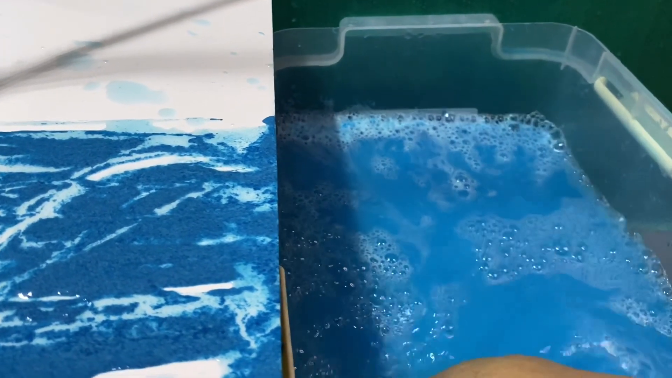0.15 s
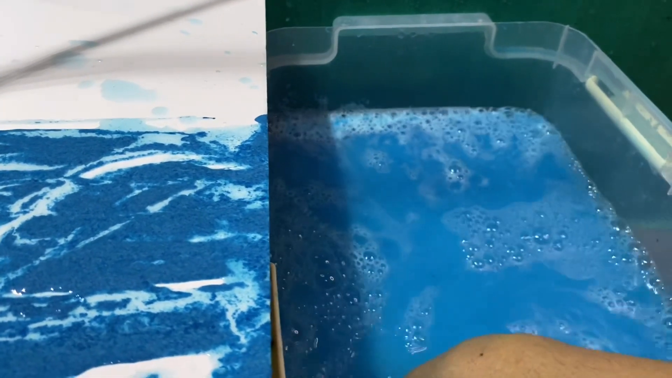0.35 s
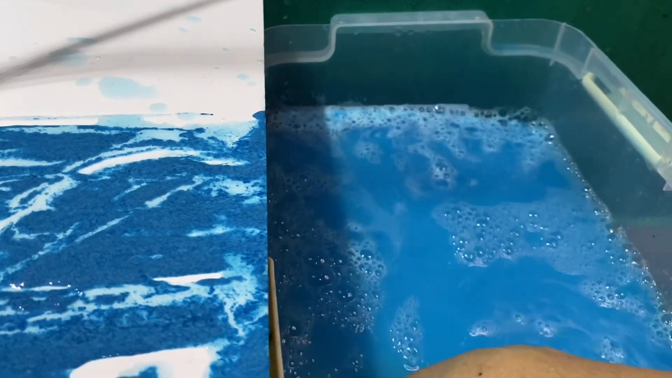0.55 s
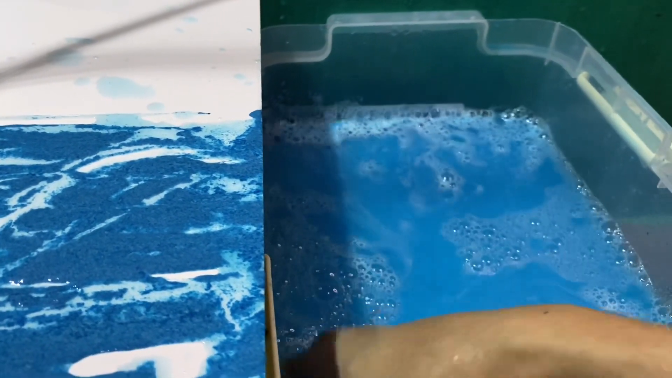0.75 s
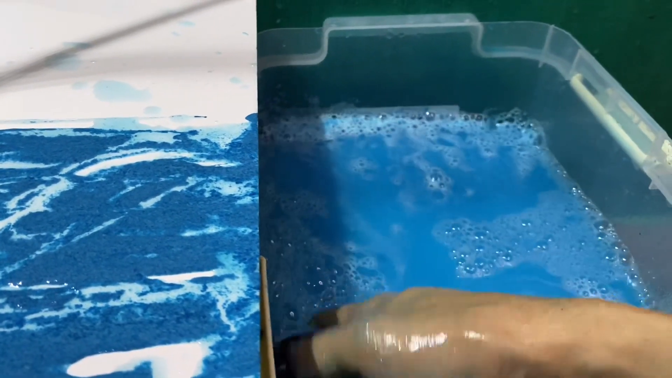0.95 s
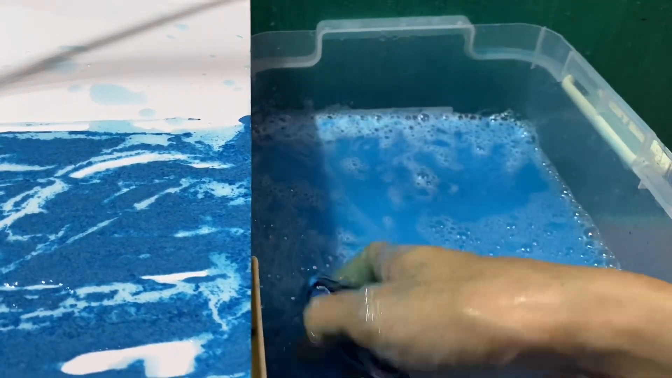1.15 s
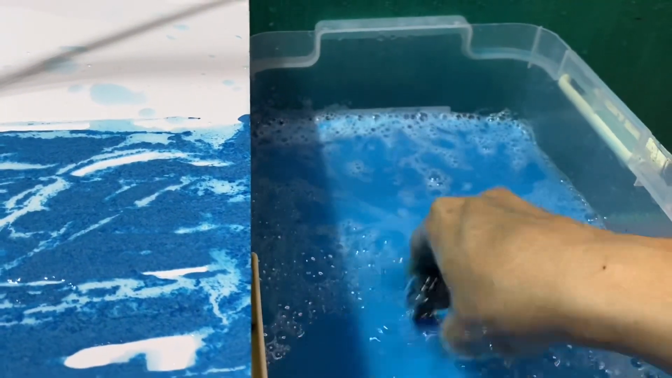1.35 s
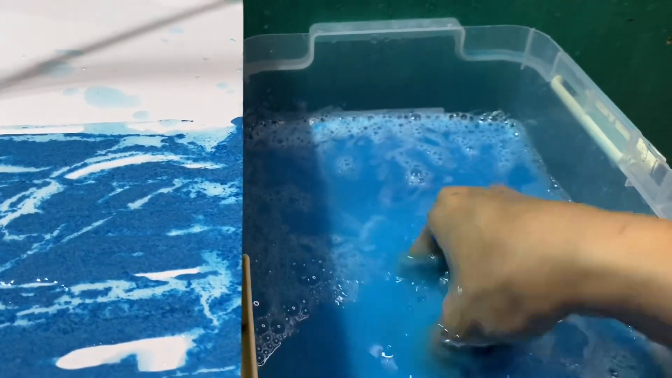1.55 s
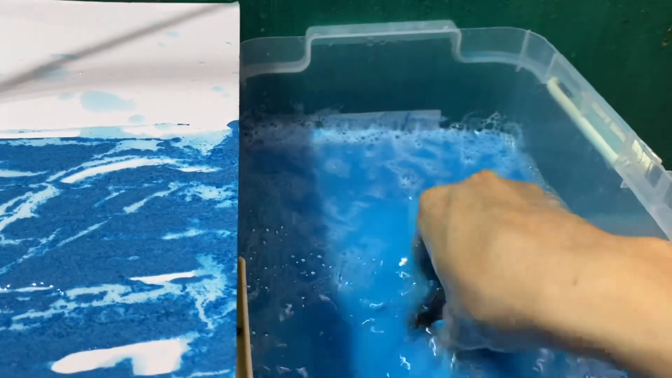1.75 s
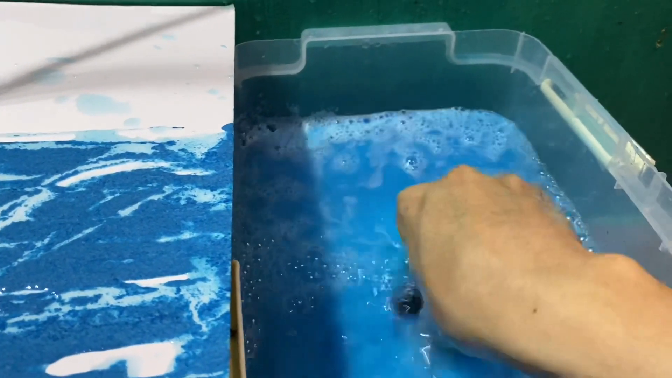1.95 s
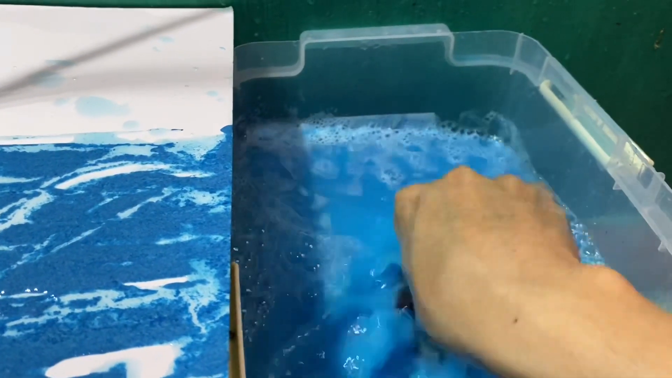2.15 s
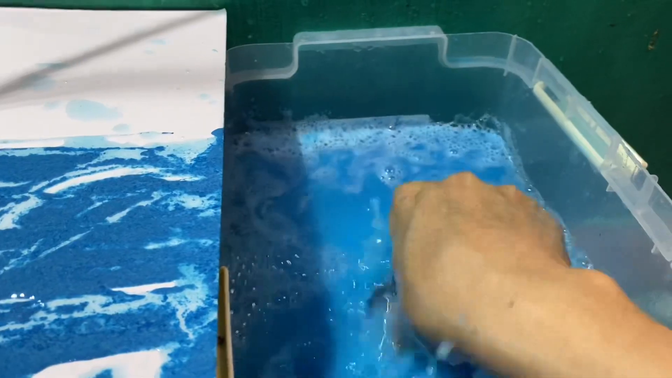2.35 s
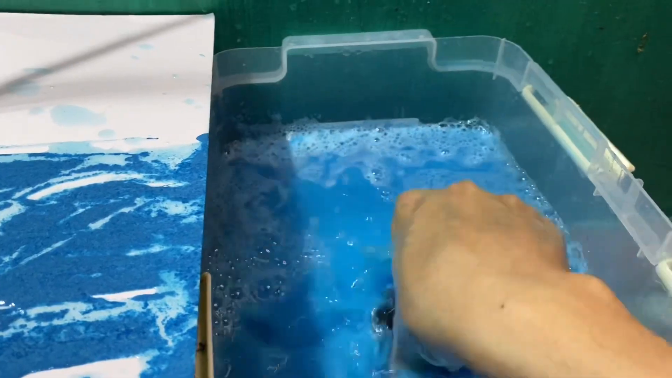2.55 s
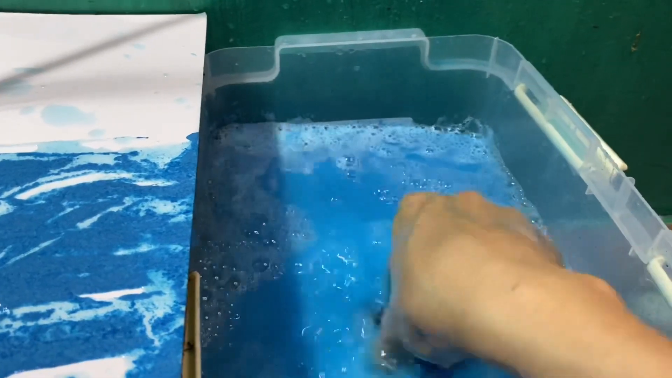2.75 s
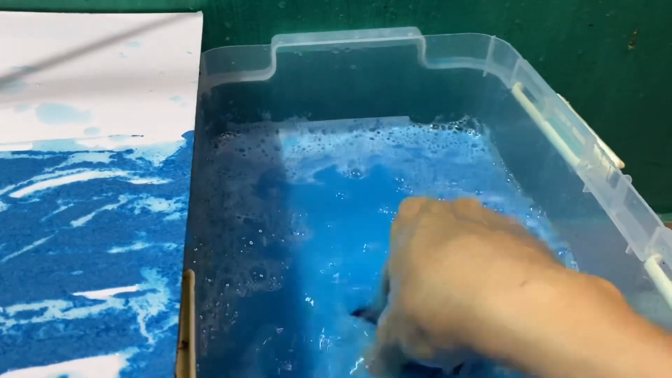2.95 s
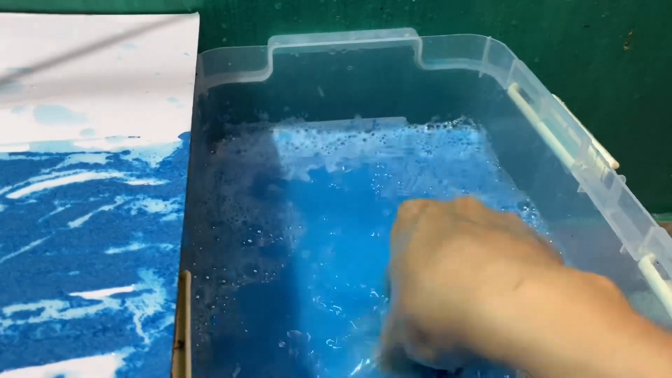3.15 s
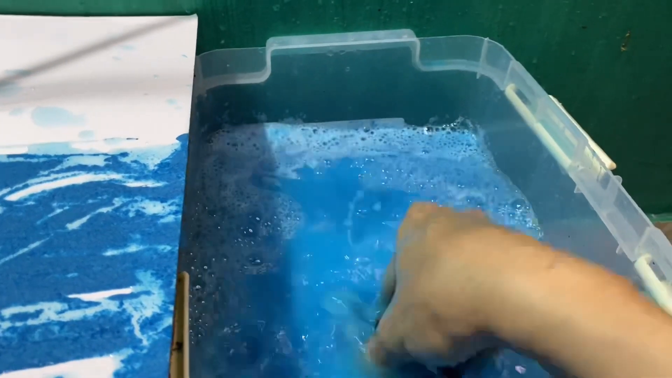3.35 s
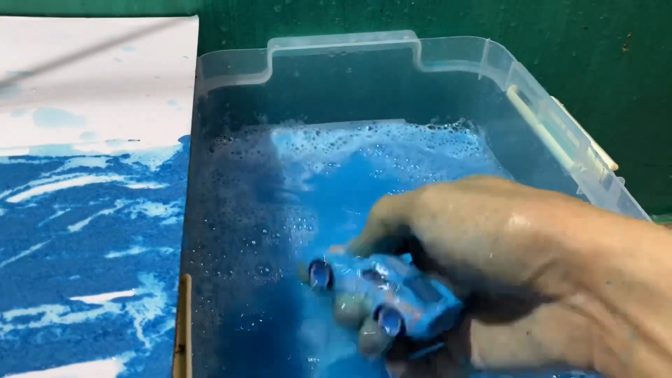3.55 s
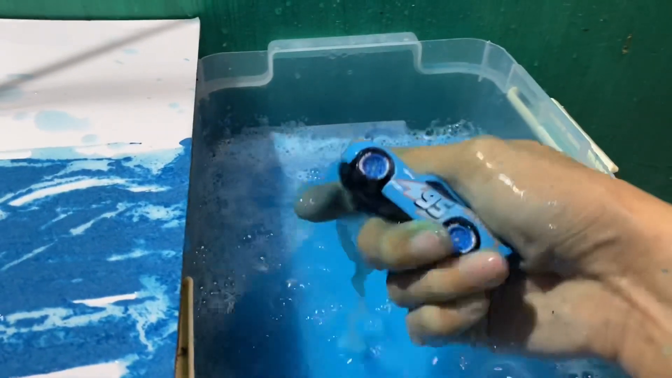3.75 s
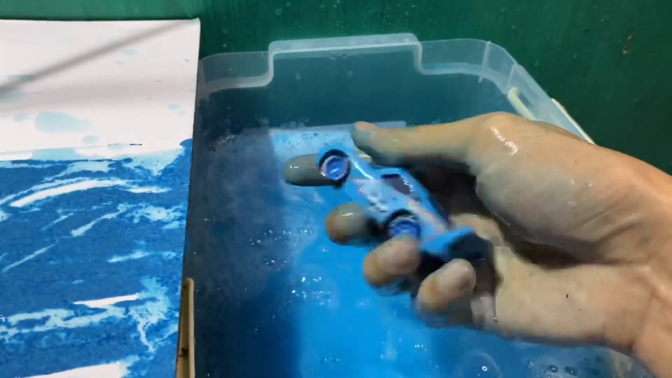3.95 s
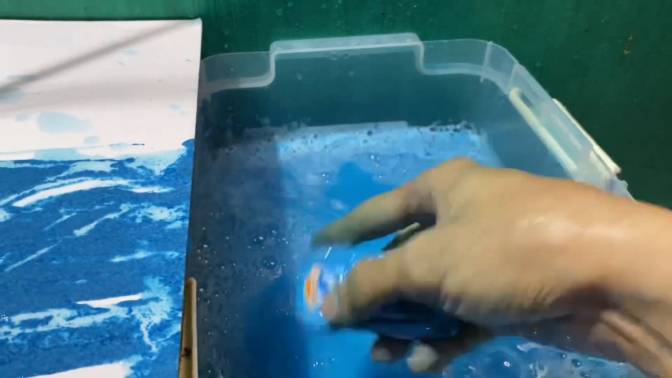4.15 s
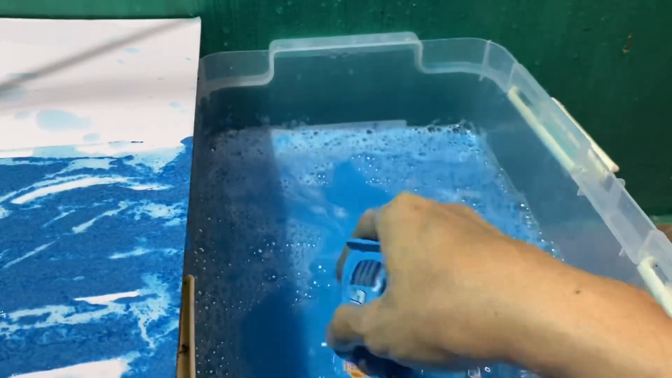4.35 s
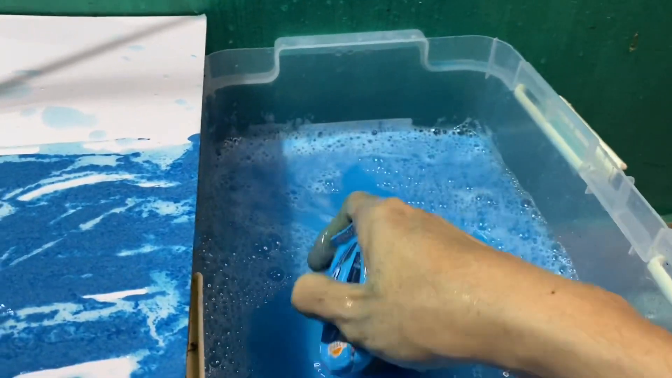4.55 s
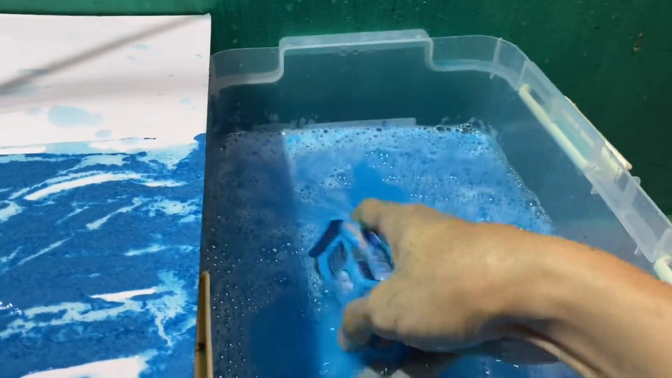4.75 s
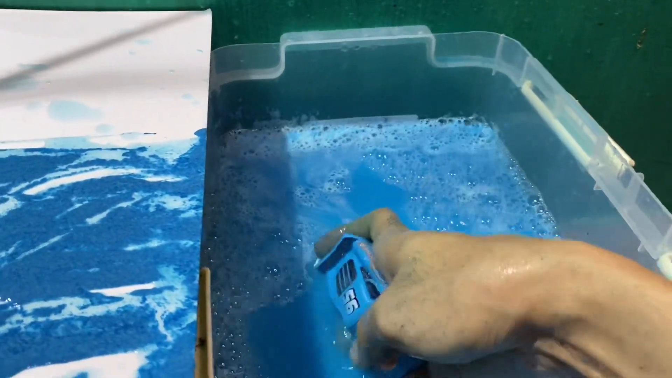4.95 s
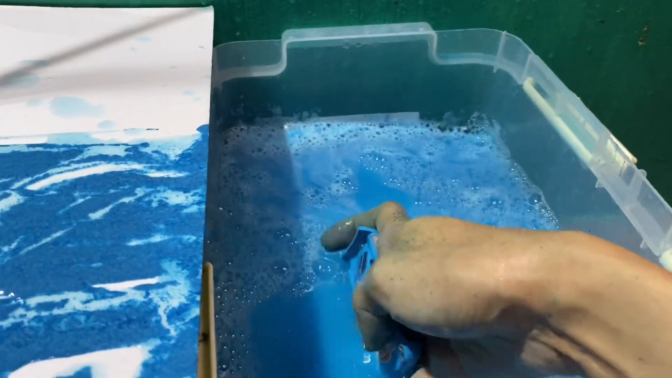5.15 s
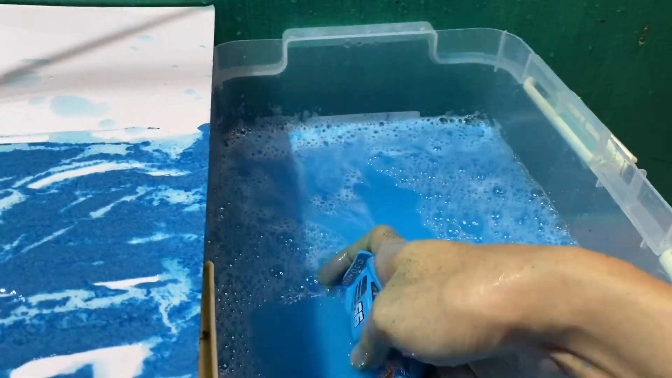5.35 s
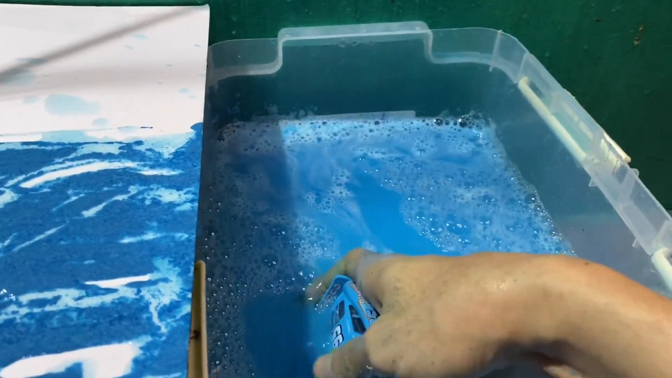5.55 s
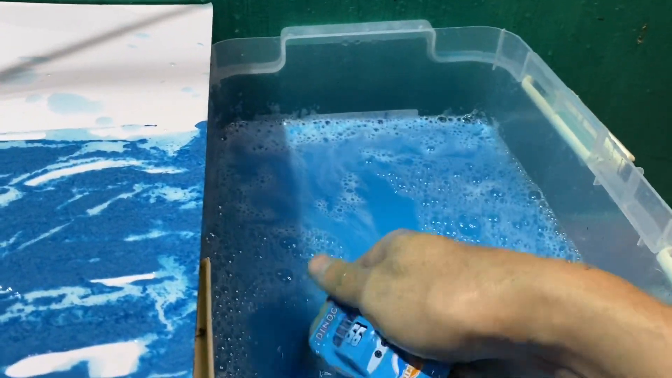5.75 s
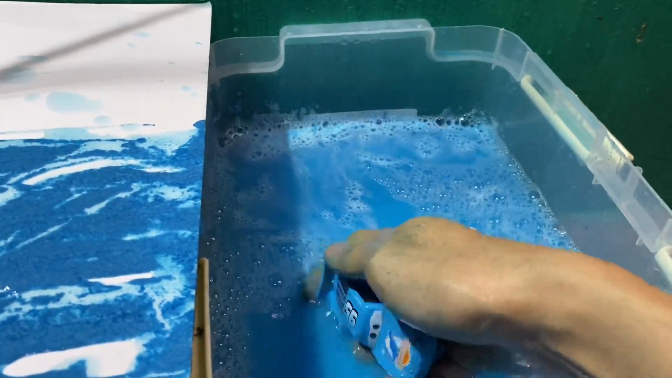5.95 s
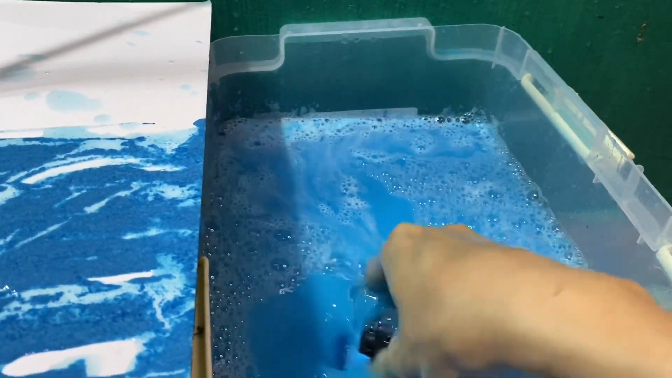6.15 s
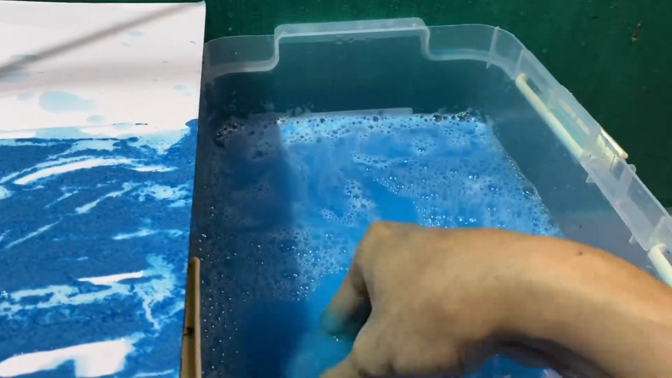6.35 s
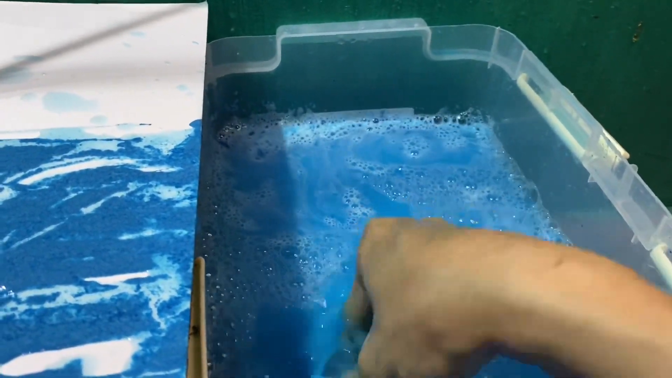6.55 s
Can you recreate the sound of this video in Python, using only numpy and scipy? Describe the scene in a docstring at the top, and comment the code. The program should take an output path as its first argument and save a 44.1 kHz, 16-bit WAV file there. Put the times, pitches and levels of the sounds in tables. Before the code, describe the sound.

A water-filled plastic tub bumps and shifts dully, then a hand swishes a small toy through it in splashing bursts, drips, clacks, and dips again.

```python
"""A plastic tub of soapy water is jostled over a low outdoor rumble, then a hand swishes a toy car in it,
lifts it out dripping and dips it again. Bubbles are decaying, gliding sines; gurgle and spray are swarms
of faint ones plus noise. Slaps, bumps and clacks are filtered noise bursts; shifting and a scuff are
filtered noise. Filling hollows and a wet squeak are swept tones. Sparse echoes of nearby walls follow."""
import sys
import numpy as np
from scipy import signal
from scipy.fft import rfft, irfft
from scipy.io import wavfile
from scipy.ndimage import uniform_filter1d

SR = 44100
rng = np.random.default_rng(int(sys.argv[2]) if len(sys.argv) > 2 else 0)


def log_audio(samples):
    """Write samples as a 16-bit WAV file to the path given in sys.argv[1]."""
    # one column per channel
    frames = np.atleast_2d(samples).T
    # limit to full scale, then quantise
    limited = np.clip(frames, -1, 1)
    pcm = np.round(limited * 32767).astype(np.int16)
    wavfile.write(sys.argv[1], SR, pcm)


N = 295425
TIME_S = np.arange(N) / SR
FREQ_HZ = np.fft.rfftfreq(2 * N, 1 / SR)  # bins of the zero-padded signal

# outdoor rumble: (frequency [Hz], relative level [dB])
AIR_SPECTRUM = [(25, -31.5), (52, -7.5), (87, -3), (134, -7.5), (170, -18), (242, -23), (394, -32.5),
                (2050, -56.5), (4870, -47.5), (16000, -59.5)]
# tub leant on and shifted: (time [s], level before trim [dB])
SHIFT_LEVELS = [(0, -42), (.16, -51.5), (.26, -40), (.36, -48.5), (.47, -40), (.63, -49), (.73, -47.5),
                (.88, -49), (1, -71.5)]
# shifting tub: (frequency [Hz], relative level [dB])
SHIFT_SPECTRUM = [(20, -31), (65, -1.5), (174, 5), (232, -4), (315, 5), (504, -6.5), (672, -4.5),
                  (1030, -19), (2930, -37), (8000, -68), (14000, -75)]
# dull bumps against the tub: (time [s], peak level [dB])
TUB_BUMPS = [(0.108, -36.5), (0.19, -27.5), (0.198, -18.5), (0.213, -26), (0.324, -30.5), (0.404, -31),
             (0.439, -33), (0.536, -29), (0.697, -33.5), (0.764, -32.5), (0.854, -45)]
# bumped tub: (frequency [Hz], relative level [dB])
BUMP_SPECTRUM = [(20, -54), (60, -0.5), (180, 7), (323, 10.5), (539, -4), (703, 4.5), (1460, -13.5),
                 (2430, -16), (5400, -32), (12000, -68)]
# steady stirring of the water: (time [s], level before part gains [dB])
STIR_LEVELS = [(0, -72), (1.1, -68), (1.49, -69.5), (1.62, -45.5), (1.93, -49), (2.3, -42), (2.67, -46),
               (3.2, -42), (3.43, -44.5), (3.72, -69), (4.27, -60.5), (4.62, -70), (4.75, -58.5),
               (5.0, -74.5), (5.55, -76), (6.0, -68.5), (6.4, -50), (6.69, -47)]
# swishes swelling above the stirring:
# (middle [s], length [s], gurgle level before trim [dB], spray level [dB])
TOY_SWISHES = [(1.714, 0.13, -39.5, -45.5), (1.83, 0.065, -51, -36.5), (2.006, 0.07, -38, -43.5),
               (2.129, 0.093, -44, -36), (2.212, 0.096, -35, -38.5), (2.335, 0.066, -37.5, -57),
               (2.41, 0.087, -38, -41), (2.531, 0.069, -37, -36.5), (2.804, 0.076, -44, -38.5),
               (2.956, 0.052, -44, -45.5), (3.096, 0.073, -36.5, -37), (3.176, 0.049, -31.5, -38.5),
               (3.308, 0.11, -40.5, -42), (3.365, 0.13, -42, -50.5), (5.712, .07, -48.5, -55.5),
               (6.452, 0.051, -44, -44)]
# middle-sized bubbles: (frequency [Hz], relative level [dB])
GURGLE_SPECTRUM = [(80, -25.5), (180, -11), (300, -18), (480, -12.5), (760, 1), (1000, -9), (1250, -1.5),
                   (2000, -15), (2300, -4.5), (2800, -18), (4500, -23.5)]
# droplets and foam: (frequency [Hz], relative level [dB])
SPRAY_SPECTRUM = [(400, -33.5), (1200, 6.5), (2400, -1.5), (3400, 3.5), (5200, -2), (8000, -6.5),
                  (11300, -5), (12500, -11.5), (16000, -10.5)]
# single bubbles that stand out, low plops to high pips, trapped by the hand or by drips off the toy:
# (time [s], starting pitch [Hz], peak level before gain [dB], pitch glide [share of pitch])
SINGLE_BUBBLES = [(0.116, 2930, -47.5, 0.058), (0.148, 3050, -45.5, -0.12), (1.3224, 3110, -36, -.1),
                  (1.503, 5100, -34.5, 0.024), (1.557, 855, -37.5, -0.22), (1.657, 804, -30, -0.097),
                  (1.737, 1717, -22.5, .37), (1.832, 3660, -22.5, -0.26), (1.9, 674, -28.5, -0.17),
                  (1.9024, 1515, -24.5, .1), (2.012, 820, -30.5, 0.083), (2.118, 2350, -21.5, 0.15),
                  (2.1756, 1252, -28.5, 0.11), (2.3367, 880, -28.5, 0.88), (2.3977, 1140, -22, 0.27),
                  (2.4006, 760, -27, -.1), (2.4497, 1080, -27, 0.12), (2.616, 790, -26, 0.33),
                  (3.0342, 786, -26.5, 0.2), (3.0961, 756, -27, 0.079), (3.103, 435, -34.5, 0.14),
                  (3.193, 368, -33.5, 0.37), (3.375, 696, -25.5, 0.19), (3.459, 1260, -30.5, 0.16),
                  (3.97, 925, -30.5, -0.031), (4.045, 2710, -39.5, 0.082), (4.1168, 780, -33, .2),
                  (4.1427, 1240, -32.5, -0.097), (4.226, 766, -42, -0.26), (4.318, 2910, -40.5, -0.16),
                  (4.4376, 833, -33, -0.19), (4.4814, 746, -28, -0.0047), (6.0392, 3160, -35, 0.35),
                  (6.0782, 817, -38.5, 0.049), (6.4764, 755, -22, 0.17), (6.609, 1203, -29, -0.086),
                  (6.648, 783, -28, -0.38)]
# toy clacking on the plastic: (time [s], peak level [dB])
TOY_CLACKS = [(0.191, -31), (0.2, -29), (0.324, -44.5), (0.763, -43), (4.766, -35), (4.7828, -15.5),
              (4.7862, -12.5), (4.792, -20.5)]
# clacking plastic: (frequency [Hz], relative level [dB])
CLACK_SPECTRUM = [(200, -38.5), (448, -28.5), (722, 2), (883, -14.5), (1350, 0.5), (1910, -15), (2210, -7),
                  (3070, -24), (4860, -16), (5520, -19), (10000, -27), (16000, -46)]
# short soft scuff: (time [s], level before trim [dB])
SCUFF_LEVELS = [(4.97, -64.5), (5.005, -52.5), (5.018, -81.5), (5.03, -52), (5.06, -55.5), (5.095, -55.5),
                (5.115, -87)]
# scuffed plastic: (frequency [Hz], relative level [dB])
SCUFF_SPECTRUM = [(100, -0.5), (450, 5), (1000, -6.5), (1450, 4), (2100, -20.5), (3300, -23), (4500, -15),
                  (7000, -49)]
# water slapping the surface, drops ticking on the toy:
# (time [s], level before gain [dB], brightness [0-1])
WATER_SLAPS = [(0.995, -40, 0.28), (1.089, -41.5, 0), (1.286, -37, 0.18), (1.582, -30, 0.52),
               (1.656, -24.5, 0.37), (1.687, -26, .5), (1.833, -23.5, 1), (1.9, -22, 0.42),
               (2.116, -24, 0.98), (2.228, -27, 0.75), (2.313, -21.5, 0.55), (2.601, -21, 0.42),
               (2.6219, -16, 0.7), (2.702, -14, 0.64), (2.9, -19, 0.3), (3.288, -28, 0.75),
               (3.376, -19, 0.97), (3.582, -34.5, 0.94), (3.613, -35, 0.31), (3.764, -39, 0.47),
               (3.889, -40.5, 0), (4.046, -36.5, 0.69), (4.112, -38, .95), (4.213, -41, 0.88),
               (4.254, -33, 0.92), (4.438, -37, 0), (4.477, -31.5, 0.31), (4.692, -28.5, 0.08),
               (5.522, -50.5, 0.4), (5.765, -43, 0), (6.037, -43, 0.4), (6.142, -32, 0.73),
               (6.229, -34.5, 0.55), (6.476, -28.5, 0.8), (6.621, -19, 0.62)]
# splat of a water sheet, also bubble pinch-off: (frequency [Hz], relative level [dB])
SPLAT_SPECTRUM = [(300, -14), (800, 4.5), (2500, 4), (4500, -0.5), (8000, -17.5), (16000, -35.5)]
# tick of a fine drop: (frequency [Hz], relative level [dB])
TICK_SPECTRUM = [(800, -19.5), (4000, -5.5), (11000, 2), (16000, -5.5)]
# water flooding a hollow of the toy: (time [s], starting pitch [Hz], level before flutter [dB])
HOLLOW_FLOODS = [(2.54, 2515, -35.5), (3.268, 2315, -32.5), (6.107, 1200, -56.5), (6.226, 2190, -43.5),
                 (6.323, 1753, -46.5), (6.389, 1440, -34.5), (6.435, 2352, -39.5)]
# air pockets escaping from under the toy:
# (time [s], starting pitch [Hz], level [dB], life until the burst [s])
AIR_GULPS = [(3.118, 840, -13.5, .004), (3.362, 780, -21, .009), (6.6229, 850, -8, .0082)]
# wet finger squeaking on the toy: (time [s], fundamental level [dB], pitch [Hz])
FINGER_SQUEAK = [(5.625, -80, 900), (5.631, -49, 992), (5.641, -72, 1130), (5.653, -52.5, 1328),
                 (5.661, -86, 1232), (5.673, -32, 1148), (5.7, -73.5, 1093)]
# lead of the left microphone port: (frequency [Hz], phase [rad])
PORT_PHASE = [(20, 0.5), (1700, 0.39), (3400, 1), (5200, 1.5), (6300, 1.47), (7000, 1.5), (8200, -5),
              (10700, -4.5), (13400, -11), (15700, -12)]
# decay of the diffuse tail by 60 dB: (frequency [Hz], time [s])
TAIL_T60 = [(150, 0.19), (700, 0.35), (2000, 0.24), (5000, 0.4), (10000, 0.027), (16000, 0.097)]
# echoes: (frequency [Hz], relative level [dB])
ECHO_SPECTRUM = [(100, -13), (700, -1.5), (2000, 4.5), (5500, -1), (9000, 0), (16000, 0)]

AIR_DB = -57
CALM_DB, CHURNED_DB = -61, -40.5  # stirring that counts as calm, as fully churned
# cycles to -60 dB at REFERENCE_HZ: foam damps sooner
REFERENCE_HZ, CALM_CYCLES, CHURNED_CYCLES = 800, 60, 24.5
SMALL_DAMPING_POWER = 0.68  # smaller bubbles ring for fewer cycles, by this power of pitch
SPRAY_UNDER_DB, SPRAY_POWER = -4, 1.053  # spray offset at CHURNED_DB, growth with stirring
THROWN_GURGLE_DB, THROWN_SPRAY_DB = -22.5, -21.5  # thrown water relative to the slap's table level
SETTLE_S = 0.034  # time constant of thrown water falling back
FLOOD_S, FLOOD_OCTAVES_PER_S = 0.022, 30
GULP_GLIDE = -0.2  # share of pitch
EDGE_HZ = 15900


def amp(db):
    """Decibels to gain."""
    return 10 ** (np.asarray(db) / 20)


def unit(x):
    """Scales to rms 1."""
    return x / np.sqrt(np.mean(x ** 2) + 1e-20)


def read(points, hz):
    """Interpolates a spectrum on a log-frequency axis."""
    point_hz, value = np.transpose(points)
    return np.interp(np.log(hz + 1), np.log(point_hz + 1), value)


def level(rows):
    """dB curve to gain per sample; the last level holds 40 ms, silence elsewhere."""
    rows = np.asarray(rows)
    sounding = (TIME_S >= rows[0, 0]) & (TIME_S <= rows[-1, 0] + .04)
    return sounding * amp(np.interp(TIME_S, rows[:, 0], rows[:, 1]))


def add(mix, start_s, sound):
    """Mixes a sound in at a time."""
    part = mix[max(0, round(start_s * SR)):][:len(sound)]
    part += sound[:len(part)]


def colour(x, points, size=2048):
    """Causal minimum-phase filter of unit energy with the given spectrum."""
    log_gain = np.log(amp(read(points, abs(np.fft.fftfreq(size, 1 / SR)))))
    response = np.exp(np.conj(signal.hilbert(log_gain)))
    taps = np.fft.ifft(response).real[:size // 2]
    return signal.oaconvolve(x, taps / np.linalg.norm(taps))[:len(x)]


def burst(t60_s, points, size=6000):
    """Dying puff of coloured noise, peak 1."""
    decay = amp(-60 * np.arange(size) / SR / max(t60_s, .001))
    puff = colour(rng.standard_normal(size) * decay, points)
    return puff / abs(puff).max()


def slow_noise(size):
    """Smoothed noise of rms 1; size is the averaging length in samples."""
    return unit(uniform_filter1d(rng.standard_normal(N), size=size))


def bubble(hz, t60_s, glide, onset_s=.0005, glide_s=0.019):
    """A pocket of air rings and dies; its pitch slides as it nears the surface."""
    t = np.arange(int(max(t60_s, .002) * SR)) / SR
    shape = amp(-60 * t / t60_s) * (1 - np.exp(-t / onset_s)) ** 2
    pitch_hz = hz * (1 + glide * (1 - np.exp(-t / glide_s)))
    return shape / shape.max() * np.sin(2 * np.pi * np.cumsum(pitch_hz) / SR)


def air(side_db=-13):
    """Low outdoor rumble, nearly the same on both sides."""
    mid, side = (unit(colour(rng.standard_normal(N), AIR_SPECTRUM, size=8192)) for _ in range(2))
    return amp(AIR_DB) * (mid + amp(side_db) * np.array([side, -side]))


def jostle(shift_trim_db=-1, bump_t60_s=0.068, judder_db=2.5):
    """The water-laden tub bumps, and judders as it slides."""
    judder = amp(judder_db * np.clip(slow_noise(600), -2, 2))
    sliding = unit(colour(judder * rng.standard_normal(N), SHIFT_SPECTRUM))
    out = amp(shift_trim_db) * level(SHIFT_LEVELS) * sliding
    for start_s, db in TUB_BUMPS:
        add(out, start_s, amp(db) * burst(bump_t60_s, BUMP_SPECTRUM))
    return out


def stirring(part, offset_db, thrown_db, steepness=1):
    """Gain of one part: steady stirring, an arch per swish and settling after each slap, summed as power."""
    steady = amp(CHURNED_DB + offset_db) * (level(STIR_LEVELS) / amp(CHURNED_DB)) ** steepness
    power = steady ** 2
    for middle_s, length_s, gurgle_db, spray_db in TOY_SWISHES:
        arch = np.cos(np.pi * np.clip((TIME_S - middle_s) / length_s, -.5, .5))
        power += (amp(spray_db if part == "spray" else gurgle_db) * arch) ** 2
    settling = np.exp(-np.arange(SR // 2) / SR / SETTLE_S)
    for start_s, db, bright in WATER_SLAPS:
        water = np.clip(1 - bright, 0, 1)  # fine bright drops move little water
        add(power, start_s, water * (amp(db + thrown_db) * settling) ** 2)
    return np.sqrt(power)


def swarm(loudness, per_s, low_hz, high_hz, cycles, spread_db, count=40):
    """Many bubbles of all sizes in a pitch range, rms near 1; harder stirring makes more of them."""
    density = np.clip(loudness / amp(-39.5), .1, 2) ** .3 * per_s / SR
    chance = rng.random(N)
    size = np.minimum(rng.exponential(1, N), 2.5)
    kind = rng.integers(0, count, N)
    damping = rng.uniform(.4, 1.6, count)
    glide = rng.uniform(-.1, .7, count)
    rings = []
    for hz, d, g in zip(np.geomspace(low_hz, high_hz, count), damping, glide):
        ring = bubble(hz, min(cycles * d / hz, .06), g, onset_s=0.66 / hz)
        rings.append(ring / np.linalg.norm(ring))
    gain = unit(amp(spread_db * size)) / np.sqrt(density)  # most are faint, a few are loud
    out = np.zeros(N)
    for i in np.flatnonzero(chance < density):
        add(out, i / SR, gain[i] * (-1) ** i * rings[kind[i]])
    return out


def whiten(x):
    """Evens the spectrum of a swarm, which holds equal energy in each octave."""
    return unit(irfft(rfft(x, 2 * N) * np.sqrt(FREQ_HZ))[:N])


def gurgle(trim_db=0.5, churn_db=-14):
    """Middle-sized bubbles churned up by the hand, over a little noise."""
    loudness = stirring("gurgle", 0, THROWN_GURGLE_DB)
    bubbles = whiten(swarm(loudness, per_s=900, low_hz=167.2, high_hz=3718, cycles=36, spread_db=6.5))
    churn = amp(churn_db) * rng.standard_normal(N)
    return amp(trim_db) * loudness * unit(colour(bubbles + churn, GURGLE_SPECTRUM))


def spray(fizz_db=-9, clump_db=4.5):
    """Droplets and bursting foam, arriving in clumps, with a fine fizz."""
    loudness = stirring("spray", SPRAY_UNDER_DB, THROWN_SPRAY_DB, SPRAY_POWER)
    drops = whiten(swarm(loudness, per_s=2600, low_hz=1567, high_hz=15440, cycles=44, spread_db=3.0))
    clumps = amp(clump_db * np.clip(slow_noise(260), -2, 2))
    fizz = amp(fizz_db) * rng.standard_normal(N)
    return loudness * unit(colour(clumps * (drops + fizz), SPRAY_SPECTRUM))


def single_bubbles(gain_db=2.5, pinch_db=-11, pinch_t60_s=0.02):
    """Bubbles that stand out, each starting with a tick as it pinches off; calm water lets them ring longer."""
    out = np.zeros(N)
    for start_s, hz, db, glide in SINGLE_BUBBLES:
        stir_db = np.interp(start_s, *np.transpose(STIR_LEVELS))
        cycles = np.interp(stir_db, [CALM_DB, CHURNED_DB], [CALM_CYCLES, CHURNED_CYCLES])
        cycles *= (REFERENCE_HZ / hz) ** SMALL_DAMPING_POWER
        add(out, start_s, amp(db) * bubble(hz, cycles / hz, glide, onset_s=0.00092))
        add(out, start_s, amp(db + pinch_db) * burst(pinch_t60_s, SPLAT_SPECTRUM))
    return out * amp(gain_db)


def toy(clack_t60_s=0.028, scuff_trim_db=-1):
    """Hard plastic chatters on plastic, then scuffs."""
    scuff = unit(colour(rng.standard_normal(N), SCUFF_SPECTRUM))
    out = amp(scuff_trim_db) * level(SCUFF_LEVELS) * scuff
    for start_s, db in TOY_CLACKS:
        add(out, start_s, amp(db) * burst(clack_t60_s, CLACK_SPECTRUM))
    return out


def slaps(gain_db=4.5, splat_t60_s=0.026, tick_t60_s=0.018):
    """Sheets of water land with a splat; fine drops with a bright tick."""
    out = np.zeros(N)
    for start_s, db, bright in WATER_SLAPS:
        bright = np.clip(bright, 0, 1)
        splat = (1 - bright) * burst(splat_t60_s, SPLAT_SPECTRUM)
        tick = bright * burst(tick_t60_s, TICK_SPECTRUM)
        add(out, start_s, amp(db + gain_db) * (splat + tick))
    return out


def floods(rough=0.59):
    """The air left in a filling hollow shrinks, so its ring climbs, unevenly in level."""
    t = np.arange(int(FLOOD_S * SR)) / SR
    out = np.zeros(N)
    flutter = 1 + rough * slow_noise(100)
    for start_s, hz, db in HOLLOW_FLOODS:
        pitch_hz = hz * 2 ** (FLOOD_OCTAVES_PER_S * t)
        ring = np.sin(2 * np.pi * np.cumsum(pitch_hz) / SR)
        add(out, start_s, amp(db) * np.sin(np.pi * t / FLOOD_S) * ring)
    return flutter * out


def gulp(t60_s=0.47):
    """A big bubble rings near full strength until it bursts."""
    out = np.zeros(N)
    for start_s, hz, db, life_s in AIR_GULPS:
        ring = bubble(hz, t60_s, GULP_GLIDE)
        cutoff = np.exp(-(np.arange(len(ring)) / SR / life_s) ** 4)
        add(out, start_s, amp(db) * ring * cutoff)
    return out


def squeak(overtone_db_per_octave=-11, count=4):
    """Stick and slip: a short tone with a few overtones."""
    time_s, _, hz = np.transpose(FINGER_SQUEAK)
    turns = np.cumsum(np.interp(TIME_S, time_s, hz)) / SR
    tone = np.zeros(N)
    for k in range(1, count + 1):
        tone += amp(overtone_db_per_octave * np.log2(k)) * np.sin(2 * np.pi * k * turns)
    return level(FINGER_SQUEAK) * tone


def ports(x):
    """The direct sound reaches the two microphone ports out of step."""
    phase = np.interp(FREQ_HZ, *np.transpose(PORT_PHASE))
    # half of the phase difference goes to each side
    return irfft(rfft(x, 2 * N) * np.exp(.5j * np.array([phase, -phase])))[:, :N]


def room(x, early_db, tail_db, early_t60_s=0.021):
    """Quick echoes from the tub's walls and a diffuse tail from the yard, different on each side."""
    t = np.arange(SR // 2) / SR
    out = []
    for _ in range(2):
        early, late = rng.standard_normal((2, len(t))) * (rng.random((2, len(t))) < .1)  # sparse
        early *= amp(-60 * t / early_t60_s) * (t > .001)
        hz, when_s, z = signal.stft(late * (t > .007), SR, nperseg=256)
        z = z * amp(-60 * when_s / read(TAIL_T60, hz)[:, None])
        late = signal.istft(z, SR, nperseg=256)[1][:len(t)]
        echo = amp(early_db) * early / np.linalg.norm(early) + amp(tail_db) * late / np.linalg.norm(late)
        out.append(signal.oaconvolve(x, colour(echo, ECHO_SPECTRUM))[:N])
    return np.array(out)


def wandering_room(x, early_db, tail_db, count=3):
    """Splashes land all over the tub, so the echo pattern cycles among a few places."""
    place = np.cumsum(rng.uniform(0, 40, N)) / SR  # about 20 places per second
    away = abs((place - np.arange(count)[:, None]) % count - count / 2)
    # neighbouring places cross-fade at equal power
    return sum(room(x * np.cos(np.pi / 2 * np.minimum(d, 1)), early_db, tail_db) for d in away)


def scene():
    """Water and tub in their surroundings."""
    splashing = gurgle() + spray()
    ringing = single_bubbles() + gulp() + floods() + squeak()
    striking = slaps()
    knocks = jostle() + toy()
    echoes = wandering_room(splashing + amp(-3.5) * striking, early_db=-5, tail_db=-12.5)
    echoes += room(ringing, early_db=-7.5, tail_db=-13.5)
    echoes += room(knocks, early_db=-9.5, tail_db=-12.5)
    return ports(splashing + ringing + striking + knocks) + echoes + air()


def record(dry):
    """Band limit: a steep linear-phase low-pass."""
    taps = signal.firwin(401, EDGE_HZ, window=("kaiser", 8), fs=SR)
    return signal.oaconvolve(dry, taps[None], "same")


dry = scene()
out = record(dry)
log_audio(out)
```